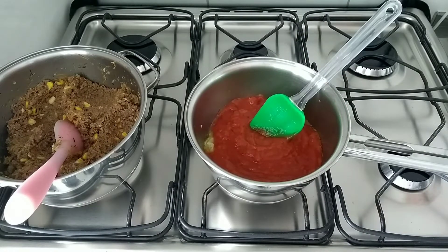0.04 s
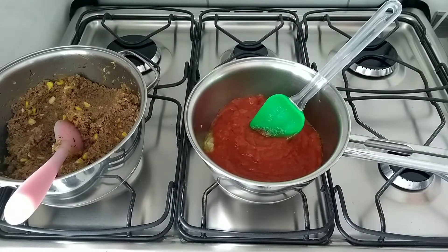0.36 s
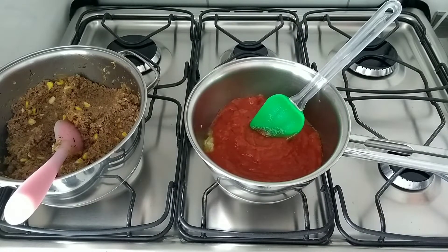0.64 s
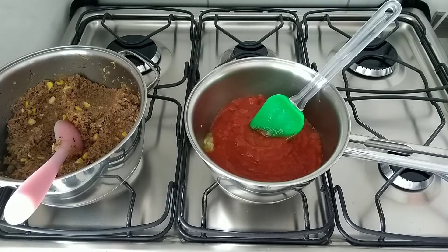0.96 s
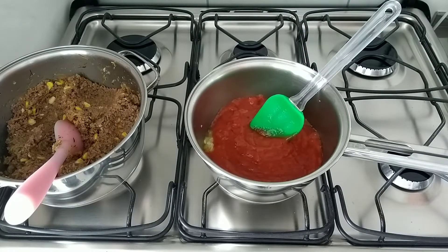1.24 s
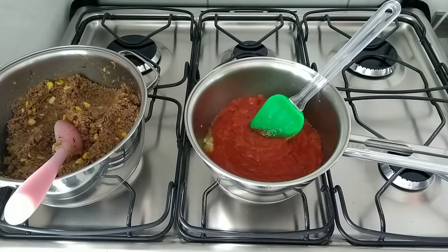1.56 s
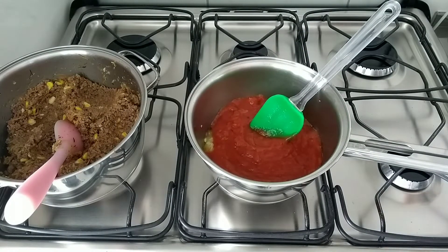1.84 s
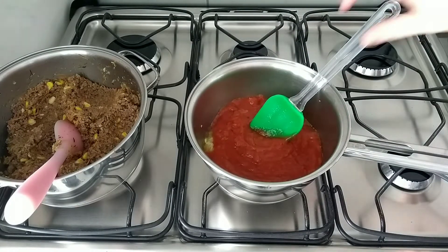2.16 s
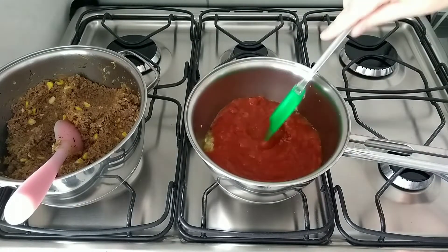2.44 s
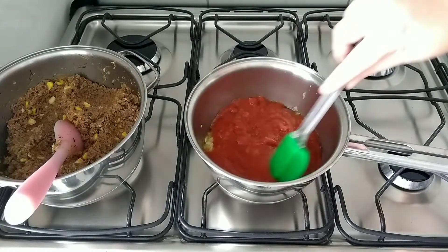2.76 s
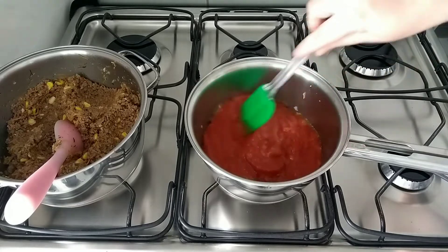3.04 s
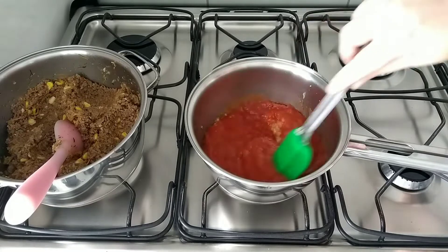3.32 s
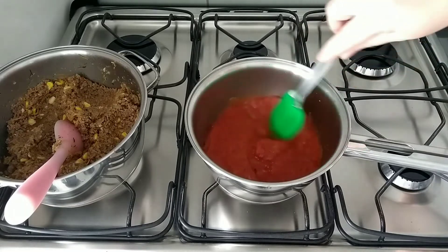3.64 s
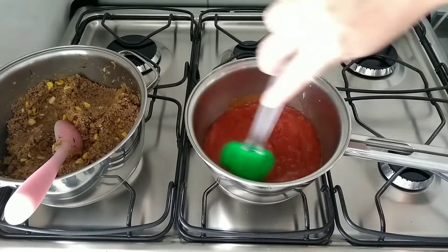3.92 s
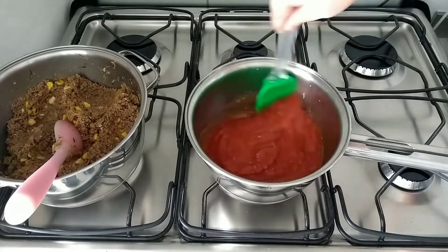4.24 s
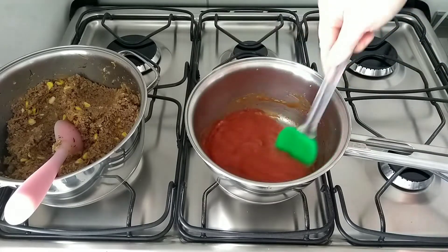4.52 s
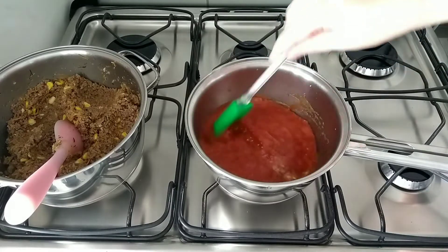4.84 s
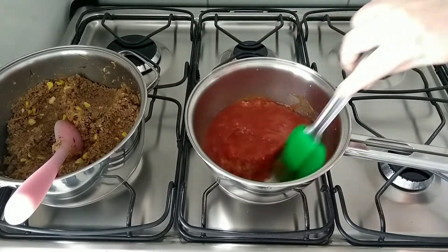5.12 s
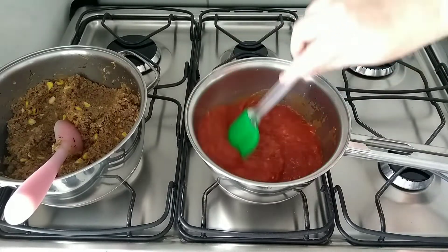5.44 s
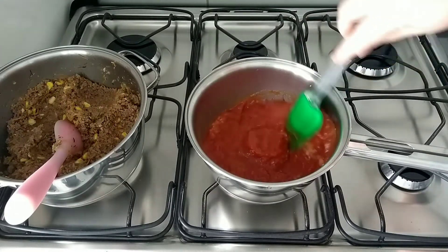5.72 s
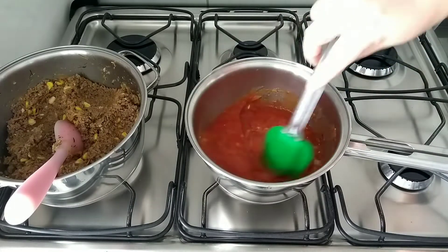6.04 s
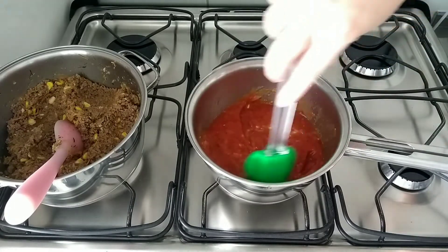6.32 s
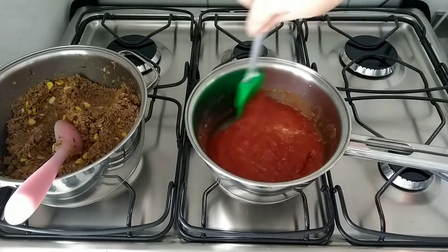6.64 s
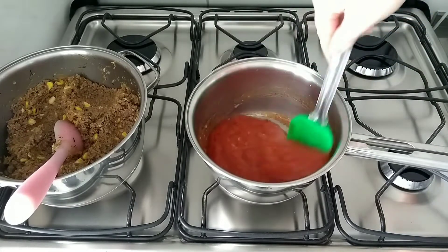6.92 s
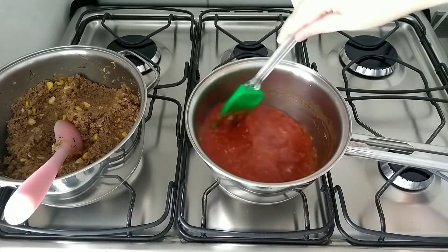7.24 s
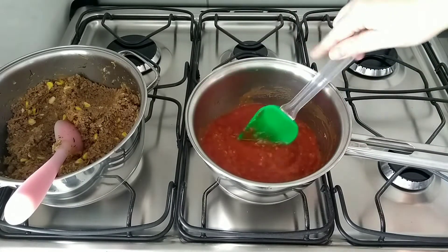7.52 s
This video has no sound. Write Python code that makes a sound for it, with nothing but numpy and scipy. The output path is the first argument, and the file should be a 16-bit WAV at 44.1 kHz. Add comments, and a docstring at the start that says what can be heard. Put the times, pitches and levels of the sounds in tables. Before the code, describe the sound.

Thick sauce simmers in a steel saucepan, heard close up in a small kitchen: a soft sizzle with low bubbling, little crackles, puffs of steam and spitting droplets over a faint rumble. Between about 0.6 and 1 second the pan gives a cluster of light, hollow knocks on the stove grate. At around 2.8 seconds it knocks and drags briefly as a silicone spatula starts stirring, with the strongest squelch and burst of sizzle. Uneven strokes follow, two or three a second, each with a swell of hiss and often a wet smack or squelch. The pan scrapes softly near 5 seconds. From about 3.5 to 7 seconds a barely audible engine gathers speed far outside. After 6 seconds the stirring turns softer, with a few sharp spits and faint pan rings. Around 7.3 seconds the pan knocks and drags on the grate again.

```python
"""Stirring a simmering tomato sauce

Thick sauce simmers in a steel saucepan on a gas stove in a small kitchen. Each stroke of a silicone
spatula squelches air pockets and wipes sauce over the hot steel, where tiny steam bubbles sizzle.
Droplets spit, the pan knocks and drags on its grate, and an engine drones faintly far outside."""
import sys
import numpy as np
from scipy import signal
from scipy.fft import rfft, irfft, next_fast_len
from scipy.io import wavfile

SR = 44100
rng = np.random.default_rng(int(sys.argv[2]) if len(sys.argv) > 2 else 0)


def master(y):
    """Save y as 16-bit WAV."""
    cut = np.clip(np.atleast_2d(y).T, -1, 1)
    pcm = np.round(cut * 32767)  # scale
    wavfile.write(sys.argv[1], SR, pcm.astype(np.int16))


N = 334182


def from_db(db):
    """Decibels to gain."""
    return np.exp(np.asarray(db) * (np.log(10) / 20))


def rms_one(x):
    """Scale to rms 1."""
    return x / np.sqrt(np.mean(x ** 2) + 1e-20)


def in_time(rows):
    """Each column of an automation curve at every sample."""
    times, *columns = np.transpose(rows)
    return [np.interp(np.arange(N) / SR, times, column) for column in columns]


def in_frequency(rows, hz):
    """Each column of a table at the given frequencies, joined on a log axis."""
    points, *columns = np.transpose(rows)
    return [np.interp(np.log(hz + 1), np.log(points), column) for column in columns]


def equalise(x, curve):
    """Shape a steady texture with a smooth EQ curve; rms 1."""
    size = next_fast_len(N)
    gain_db, = in_frequency(curve, np.arange(size // 2 + 1) * SR / size)
    return rms_one(irfft(rfft(x, size) * from_db(gain_db), size)[..., :N])


def drift(rate_hz):
    """Smooth random wander with rms 1."""
    hop, settle = 40, 2000
    pole = np.exp(-2 * np.pi * rate_hz * hop / SR)
    noise = rng.standard_normal(N // hop + settle + 2)
    slow = signal.lfilter([1], [1, -2 * pole, pole ** 2], noise)[settle:]
    return np.interp(np.arange(N) / hop, np.arange(len(slow)), rms_one(slow))


def taking_turns(count, rate_hz, spread_db):
    """Wandering gains that share one steady total power."""
    shares = from_db(spread_db * np.array([drift(rate_hz) for _ in range(count)]))
    return shares / np.sqrt(np.mean(shares ** 2, axis=0))


def resonance(x, hz, width_hz):
    """Two-pole band-pass with gain 1 at its peak."""
    r = np.exp(-np.pi * width_hz / SR)
    feedback = [1, -2 * r * np.cos(2 * np.pi * hz / SR), r * r]
    return signal.lfilter(np.array([1, 0, -1]) * (1 - r * r) / 2, feedback, x + 1e-18)


def band(x, hz, breadth):
    """Band-pass reaching a factor of 1 + breadth either side of its centre."""
    edges = np.clip([hz / (1 + breadth), hz * (1 + breadth)], 20, .45 * SR)
    return signal.sosfilt(signal.butter(2, edges, "band", fs=SR, output="sos"), x)


def stereo(pair, alike):
    """Blend two unrelated signals into left and right, from wide (alike 0) to mono (alike 1)."""
    mid = np.sqrt(1 + alike) * pair[0]
    side = np.sqrt(1 - alike) * pair[1]
    return np.array([mid + side, mid - side]) / np.sqrt(2)


def grains(samples, grain_db, alike):
    """Stereo noise roughened by a random gain on every sample."""
    noise = stereo(rng.standard_normal((2, samples)), alike)
    return noise * from_db(grain_db * rng.standard_normal(samples))


def clicks(per_s, spread_db):
    """Random clicks of uneven size, different in each channel; power 1 at any rate."""
    born = rng.random(N) < per_s / SR
    sizes = from_db(spread_db * np.minimum(rng.exponential(1, N), 4))
    return rms_one(born * sizes * rng.standard_normal((2, N)) / np.sqrt(per_s))


def bubbles(births, low_hz, high_hz, q, pitches):
    """Each click sets one bubble ringing briefly, at a pitch dealt by chance."""
    dealt = rng.integers(0, pitches, N)
    tuning = np.geomspace(low_hz, high_hz, pitches)
    return rms_one(sum(resonance(births * (dealt == k), hz, hz / q) for k, hz in enumerate(tuning)))


def bursts(rows, breadth, grain_db, alike, rise_s):
    """Each event is a dying flurry of tiny impacts, filtered about its centre."""
    out = np.zeros((2, N))
    t = np.arange(SR // 5) / SR
    for s, db, hz, decay_s in rows:
        envelope = np.exp(-t / decay_s) * (1 - np.exp(-t / rise_s))
        burst = band(grains(len(t), grain_db, alike) * envelope, hz, breadth)
        burst *= from_db(db) * np.sqrt(decay_s * SR / np.sum(burst ** 2))
        start = round(s * SR)
        out[:, start:start + len(t)] += burst[:, :N - start]
    return out


def swells(rows, breadth, grain_db, alike):
    """Each event is a band of noise that swells and ebbs evenly about its peak."""
    out = np.zeros((2, N))
    t = np.arange(-(SR // 10), SR // 10) / SR
    for s, db, hz, length in rows:
        envelope = np.cos(np.pi * np.clip(t / length, -.5, .5)) ** 2
        swell = band(grains(len(t), grain_db, alike), hz, breadth) * envelope
        start = round(s * SR) - len(t) // 2
        out[:, start:start + len(t)] += from_db(db) * rms_one(swell) * np.sqrt(np.mean(envelope ** 2))
    return out


def push(s, length, swell_db_per_s, fade_db_per_s):
    """Envelope of one push: it swells until s, holds for its length, then fades."""
    t = np.arange(N) / SR
    ramps_db = np.minimum(swell_db_per_s * (t - s), fade_db_per_s * (s + length - t))
    return from_db(np.clip(ramps_db, -150, 0))


def kitchen(x, t60, damping_hz):
    """Diffuse, slightly dull reflections from the tiles, different left and right."""
    t = np.arange(SR // 2) / SR
    tail = rng.standard_normal((2, len(t))) * from_db(-60 * t / t60) * (t > .005)
    tail /= np.sqrt(np.sum(tail ** 2) / 2)
    pole = np.exp(-2 * np.pi * damping_hz / SR)
    dull_tail = signal.lfilter([1 - pole], [1, -pole], tail)
    return signal.fftconvolve(x, dull_tail, axes=1)[:, :N]


# An engine gathering speed far outside.
# Each row: time in seconds, firing rate in Hz, fundamental in dB, octave in dB.
ENGINE_CLIMB = [(3.4, 57.55, -72, -86), (3.7, 60.5, -91, -66.5), (4.4, 69.1, -76, -60.5),
                (4.8, 72, -65, -71), (5.3, 78.2, -101, -64), (5.58, 87.8, -56, -68.5),
                (6.0, 91.1, -81, -66), (6.22, 104, -64, -102), (6.7, 108.6, -104, -67.5)]
def engine(waver=0.0165, flutter_db=3.0):
    """Only the two lowest orders of the distant engine come through the walls."""
    hz, fundamental_db, octave_db = in_time(ENGINE_CLIMB)
    phase = 2 * np.pi * np.cumsum(hz * (1 + waver * drift(17.3))) / SR
    orders = from_db(fundamental_db) * np.sin(phase) + from_db(octave_db) * np.sin(2 * phase)
    fade_in = np.clip(np.arange(N) / SR - ENGINE_CLIMB[0][0] + 1, 0, 1) ** 4
    return np.sqrt(2) * fade_in * orders * from_db(flutter_db * drift(25))


# The low-end fader, shared by rumble and churn. Each row: time in seconds, relative level in dB.
BASS_LEVEL = [(0, -69), (.6, -60), (1.6, -57.5), (2.9, -60), (3.3, -70.5), (4.2, -60), (5.1, -58.5),
              (6.4, -58), (7.2, -56), (7.58, -44)]
# The rumble's deep tone. Each row: frequency in Hz, gain in dB.
RUMBLE_EQ = [(20, -41), (40, -9), (58, -1), (85, 0.5), (125, -3), (170, -3.5), (260, -11.5), (600, -59)]
def rumble(gain_db=-3.0, flutter_db=4.5):
    """A soft, uneven rumble at the stove."""
    level_db, = in_time(BASS_LEVEL)
    air = stereo(rng.standard_normal((2, N)), alike=0.033)
    return equalise(air, RUMBLE_EQ) * from_db(level_db + gain_db + flutter_db * drift(5.5))


# The churn's low-mid body. Each row: frequency in Hz, gain in dB.
CHURN_EQ = [(80, -81), (170, 5), (290, 10), (480, 7.5), (650, 3.5), (1100, 3)]
def churn(stir_db, duck_per_db=0.49, gain_db=-3.5, flutter_db=2.0):
    """Low bubbling of the sauce, turned down while the strokes' sizzle is loud."""
    level_db = in_time(BASS_LEVEL)[0] - duck_per_db * stir_db
    bubbling = bubbles(clicks(4000, spread_db=2.0), 142.6, 678, q=26.5, pitches=12)
    body = equalise(stereo(bubbling, alike=0.47), CHURN_EQ)
    return body * from_db(level_db + gain_db + flutter_db * drift(19.0))


# The ring of pan and grate. Each row: pitch in Hz, gain in dB, seconds to die away by 60 dB.
PAN_MODES = [(171, -7, 0.11), (340, 4, .06), (451, 6, 0.064), (624, 9, .22), (697, 0.5, .05),
             (768, 0, 0.12), (868, -6, .07), (1049, 0.5, 0.14), (1323, -3, 0.083), (1506, 3, 0.077),
             (1997, 0, 0.1)]
def pan_ring(force):
    """The pan's modes answer a force, damped by the sauce."""
    return sum(from_db(db) * resonance(force, hz, np.log(1000) / (np.pi * t60))
               for hz, db, t60 in PAN_MODES)


# The pan knocking on its grate.
# Each row: start in seconds, relative level in dB, pitch in Hz, rattle decay in seconds.
PAN_KNOCKS = [(0.596, -36.5, 430, 0.0063), (0.621, -35, 393, 0.015), (0.7656, -28.5, 440, 0.043),
              (0.769, -33, 786, 0.0083), (0.778, -23, 790, 0.0022), (0.7827, -35, 473, 0.013),
              (0.793, -42, 720, 0.11), (0.897, -27, 600, 0.021), (0.907, -26.5, 394, 0.036),
              (0.9116, -58, 620, 0.022), (0.918, -28.5, 880, 0.0033), (0.938, -47, 427, 0.02),
              (0.954, -39, 353, 0.01), (2.825, -34, 1060, 0.011), (2.89, -24.5, 700, 0.039),
              (6.337, -42.5, 945, 0.11), (6.861, -39, 730, 0.065), (7.305, -31.5, 610, 0.03),
              (7.345, -23, 574, 0.0099), (7.353, -16.5, 1050, 0.0055), (7.389, -26, 960, 0.03),
              (7.4, -28, 385, 0.031), (7.474, -38, 940, 0.016)]
def knocks(thud_db=-13.5, rattle_db=-15.5, rise_cycles=1.24):
    """Each knock is a hollow thud, over in a few cycles, with a short rattle."""
    thuds = np.zeros(N + SR)
    t = np.arange(SR // 10) / SR
    for s, db, hz, _ in PAN_KNOCKS:
        age = t * hz / rise_cycles
        start = round(s * SR)
        thuds[start:start + len(t)] += from_db(db) * age * np.exp(1 - age) * np.sin(2 * np.pi * hz * t)
    rattles = bursts(PAN_KNOCKS, breadth=0.96, grain_db=0.5, alike=0.43, rise_s=0.0021)
    return from_db(thud_db) * thuds[:N] + from_db(rattle_db) * rattles


# The spatula shoves the pan. Each row: start of the hold and its length in seconds, relative level in dB.
PAN_DRAGS = [(2.774, 0.17, -44), (4.919, .15, -38), (7.312, 0.004, -34), (7.374, 0.014, -25.5),
             (7.418, 0.11, -33.5)]
# The scrape's tone. Each row: frequency in Hz, gain in dB.
DRAG_EQ = [(30, -42), (90, -15), (170, -0.5), (350, -2), (650, -8), (1050, -5.5), (1500, -11.5),
           (2600, -8.5), (3600, -9.5), (6000, -13), (8000, -21.5), (12000, -25), (14000, -43.5)]
def drags(gain_db=-9.0):
    """The pushed pan sticks and slips across its grate."""
    envelope = sum(from_db(db + gain_db) * push(s, length, swell_db_per_s=504, fade_db_per_s=291)
                   for s, length, db in PAN_DRAGS)
    slips = stereo(clicks(6000, spread_db=0.5), alike=0.37)
    return equalise(slips, DRAG_EQ) * envelope


def pan_on_grate(ring_db=2.5):
    """Drags and knocks shake the pan and set it ringing."""
    force = drags() + knocks()
    return force + from_db(ring_db) * pan_ring(force)


# A low gulp, a blip and the pan's brief ring after knocks. Each row: start in seconds, peak in dB,
# starting pitch in Hz, ratio of final to starting pitch, length in seconds.
SHORT_TONES = [(2.346, -41, 200, 1.55, 0.039), (6.335, -44, 644, 0.94, 0.015),
               (6.355, -47, 618, 1.0, 0.038), (6.765, -41.5, 1204, 1.14, 0.019),
               (6.863, -47, 625, 0.92, 0.071)]
def short_tones():
    """Short pitched tones swell and fade, most with a glide in pitch."""
    out = np.zeros(N)
    for s, db, hz, glide, length in SHORT_TONES:
        progress = np.linspace(0, 1, int(length * SR))
        phase = 2 * np.pi * np.cumsum(hz * glide ** progress) / SR
        start = round(s * SR)
        out[start:start + len(progress)] += from_db(db) * np.sin(np.pi * progress) ** 2 * np.sin(phase)
    return out


# Escaping steam. Each row: peak time in seconds, relative level in dB, centre in Hz, length in seconds.
STEAM_PUFFS = [(.692, -44.5, 5460, 0.028), (.79, -47.5, 5800, 0.11), (.92, -47, 6000, 0.097),
               (1.016, -44, 4000, 0.049), (1.283, -47, 6030, 0.023), (1.375, -51, 6000, 0.046),
               (1.536, -49.5, 3800, 0.062), (1.675, -43, 7000, 0.078), (1.806, -56, 4500, 0.048),
               (2.025, -46, 8500, 0.093), (2.366, -48, 4900, 0.095), (3.124, -30, 7500, 0.041),
               (3.68, -41.5, 3740, 0.036), (4.32, -36, 8480, 0.033), (4.495, -37.5, 9400, 0.055),
               (4.555, -51, 6000, 0.032), (4.943, -41.5, 6000, 0.028), (5.921, -53, 9420, .04),
               (6.345, -58.5, 2900, 0.1), (6.55, -47, 7000, 0.048), (6.67, -42.5, 2900, 0.013),
               (6.866, -48.5, 3500, 0.05)]
def puffs(gain_db=-1.0):
    """Steam breaks through the sauce in short, broad hisses."""
    return from_db(gain_db) * swells(STEAM_PUFFS, breadth=1.0, grain_db=2.0, alike=0.1)


def crackles(simmer_db, per_s=20, decay_s=0.012, gain_db=-10.0, spread_db=4.0, q=3.1):
    """Small crusts of sauce crackle irregularly at the rim, each a brief flurry at one of five pitches."""
    out = np.zeros((2, N))
    pitches = np.geomspace(3000, 8000, num=5)
    pole = np.exp(-1 / (decay_s * SR))
    for hz in pitches:
        born = rng.random(N) < per_s / len(pitches) / SR
        sizes = from_db(spread_db * np.minimum(rng.exponential(1, N), 3))
        envelope = signal.lfilter([1], [1, -pole], born * sizes + 1e-18)
        flurries = envelope * rng.standard_normal((2, N))
        out += rms_one(resonance(resonance(flurries, hz, hz / q), hz, hz / q))
    return rms_one(out) * from_db(simmer_db + gain_db)


# Spitting droplets. Each row: start in seconds, relative snap level in dB, fizz in dB, centre in Hz.
DROPLETS = [(0.025, -18, -41.5, 10400), (.109, -33, -67, 7500), (.262, -35, -51, 10500),
            (0.329, -42, -47, 8950), (.3526, -36, -47, 11500), (.373, -25, -53, 8000),
            (0.69, -28.5, -51, 5640), (1.012, -36, -47.5, 5700), (1.2825, -41, -68, 5700),
            (1.5355, -30, -55, 3440), (1.6472, -24.5, -53, 7800), (1.67, -33, -51, 10000),
            (1.939, -39, -45, 8000), (2.0134, -26, -51, 6060), (2.039, -27, -48, 11900),
            (2.071, -30, -43, 10800), (2.164, -19, -43, 10400), (2.263, -19.5, -49, 11500),
            (2.381, -24.5, -50, 5600), (2.558, -19.5, -42, 10800), (2.724, -18, -59, 12000),
            (3.129, -12, -51, 11000), (3.677, -34, -66, 4440), (3.982, -19, -43.5, 9200),
            (4.32, -19, -48, 8500), (5.098, -20, -43, 9800), (6.07, -30, -55, 11000),
            (6.545, -34, -44.5, 7000), (6.59, -10.5, -42, 12000), (6.596, -23, -50, 11500),
            (6.863, -23.5, -45, 3500)]
def spits(snap_db=-12.5, snap_s=0.0016, fizz_cycles=234):
    """A droplet snaps on the hot steel, then fizzes away; small, bright ones are gone sooner."""
    snap_rows = [(s, db, hz, snap_s) for s, db, _, hz in DROPLETS]
    fizz_rows = [(s, db, hz, fizz_cycles / hz) for s, _, db, hz in DROPLETS]
    snaps = bursts(snap_rows, breadth=0.39, grain_db=10.5, alike=0.039, rise_s=0.0001)
    fizzes = bursts(fizz_rows, breadth=1.0, grain_db=3.5, alike=0.049, rise_s=0.0008)
    return from_db(snap_db) * snaps + fizzes


# Sauce parting from the blade.
# Each row: peak time in seconds, level in dB, centre in Hz, length in seconds.
WET_SMACKS = [(2.831, -51, 900, 0.079), (2.93, -47.5, 1530, 0.22), (2.99, -44, 1800, 0.072),
              (3.114, -53, 1400, 0.078), (3.225, -55, 1250, 0.052), (3.393, -56, 840, 0.022),
              (3.521, -53.5, 1480, 0.045), (3.558, -53, 1510, 0.039), (3.665, -59, 856, 0.065),
              (3.73, -60, 320, 0.046), (3.94, -62, 840, 0.12), (3.985, -56.5, 1470, 0.054),
              (4.022, -78, 1020, 0.036), (4.091, -56, 753, 0.039), (4.095, -51.5, 1500, 0.029),
              (4.229, -48, 1340, 0.14), (4.287, -53.5, 930, 0.2), (4.313, -48.5, 1270, 0.16),
              (4.32, -60, 326, 0.042), (4.48, -64.5, 300, .05), (4.435, -53.5, 1270, 0.45),
              (4.6, -44.5, 830, 0.013), (4.87, -63, 1160, 0.029), (5.207, -55, 1700, 0.06),
              (5.259, -70, 950, .05), (5.274, -56, 1563, 0.038), (5.335, -50, 333, 0.032),
              (5.341, -53.5, 1010, 0.051), (5.378, -54, 1320, 0.05), (5.41, -56.5, 870, 0.027),
              (5.45, -55, 1960, 0.041), (5.697, -54.5, 716, 0.084), (5.701, -49.5, 1290, 0.033),
              (5.85, -64, 740, 0.041), (5.892, -58, 1550, 0.046)]
def smacks():
    """Each cavity behind the blade colours its smack with one narrow resonance."""
    return swells(WET_SMACKS, breadth=0.085, grain_db=0.0, alike=0.48)


# Brief ducks in the lower layers. Each row: centre time and half length in seconds, bass cut in dB,
# squelch cut in dB; a negative cut is a lift.
LEVEL_DIPS = [(2.902, 0.076, 25, 3.5), (3.254, 0.11, 30, 3), (3.368, 0.024, 14, 9), (3.55, 0.23, 7.5, -1),
              (3.592, 0.014, 10, 25), (3.756, .025, -9, 24), (3.875, 0.036, 12, 28), (4.2, 0.022, 51, -4),
              (4.404, 0.027, 6, 11), (4.575, 0.047, 53, -0.5), (5.19, 0.044, 41, 2.5),
              (5.433, 0.018, 13, 30), (5.78, 0.057, 2, 31), (5.847, 0.026, 47, 13), (5.933, 0.038, 7, 35),
              (6.707, 0.053, 11, 5)]
def dips():
    """Gains of the bass and of the squelch, which sink and recover in smooth bell curves."""
    t = np.arange(N) / SR
    cut_db = np.zeros((2, N))
    for s, half_length, *depths_db in LEVEL_DIPS:
        bell = np.exp(-np.minimum(((t - s) / half_length) ** 2, 20))
        cut_db += np.outer(depths_db, bell)
    return from_db(-cut_db)


# The sauce left to itself. Each row: time in seconds, rim sizzle in dB, relative bubbling level in dB.
SIMMER_LEVELS = [(0, -53.5, -56.5), (.17, -62.5, -68), (.5, -56, -59), (1.05, -52.5, -52),
                 (1.14, -48.5, -52), (1.185, -56.5, -66), (1.22, -50, -55.5), (1.7, -51, -50.5),
                 (2.3, -48, -59), (2.39, -55.5, -54.5), (2.44, -57, -72), (2.52, -51.5, -52.5),
                 (2.7, -49.5, -56), (3.35, -49.5, -65.5), (3.8, -58, -75.5), (5.05, -52, -50),
                 (5.6, -56, -64), (6.2, -60.5, -60.5), (6.48, -66, -74), (6.9, -64, -51.5),
                 (7.25, -59, -56.5), (7.58, -61.5, -41.5)]
# Spatula strokes. Each row: start of the hold and its length in seconds, sizzle in dB,
# brightness in dB, relative squelch level in dB.
SPATULA_STROKES = [(2.833, 0.016, -35.5, -9, -39), (2.877, 0.1, -26.5, 5, -36.5),
                   (3.102, 0.0091, -35.5, 2.5, -45), (3.203, 0.056, -47, -3, -93),
                   (3.449, 0.0055, -39.5, 5.5, -61.5), (3.52, 0.058, -39.5, 3, -56.5),
                   (3.679, 0.034, -47, -2, -64), (3.827, 0.074, -43, 1, -95),
                   (4.034, 0.022, -38.5, 4.5, -57), (4.171, 0.013, -44.5, 15, -66),
                   (4.219, 0.07, -35, -4.5, -53.5), (4.317, 0.23, -39, 1.5, -49),
                   (4.576, 0.13, -41, 0.5, -46), (4.8, 0.083, -40.5, -0.5, -48),
                   (5.169, 0.095, -34.5, 0, -61), (5.335, 0.028, -35.5, 4, -62),
                   (5.421, 0.042, -33.5, 5, -82), (5.687, 0.011, -39, -1.5, -52),
                   (5.798, 0.13, -35.5, 3.5, -89), (6.582, 0.014, -49, -13, -48.5),
                   (6.688, 0.015, -40, 2, -78), (6.755, 0.15, -50.5, 1, -48.5),
                   (7.03, 0.013, -51, -6, -52.5), (7.106, 0.04, -54.5, -6, -57)]
def stirring(simmer_bright_db=3.5):
    """Strokes add their power to the simmer; dB curves of simmer, total sizzle, brightness and squelch."""
    simmer_db, bubbling_db = in_time(SIMMER_LEVELS)
    hiss_power, wet_power = from_db([simmer_db, bubbling_db]) ** 2
    weighted_bright = hiss_power * simmer_bright_db
    for s, length, sizzle_db, bright_db, squelch_db in SPATULA_STROKES:
        stroke = push(s, length, swell_db_per_s=198, fade_db_per_s=187.5)
        fresh_power = (stroke * from_db(sizzle_db)) ** 2
        hiss_power += fresh_power
        weighted_bright += fresh_power * bright_db
        wet_power += (stroke * from_db(squelch_db)) ** 2
    return simmer_db, 10 * np.log10(hiss_power), weighted_bright / hiss_power, 10 * np.log10(wet_power)


# The squelch's wet midrange. Each row: frequency in Hz, gain in dB.
SQUELCH_EQ = [(330, -61), (550, -33), (730, 11.5), (1050, 10), (1250, 9), (1550, 9), (2000, -1), (2600, 10),
              (5000, -44)]
def squelch(level_db, gain_db=-5.5, flutter_db=3.5):
    """Air pockets open and close so densely that they smear, and the pan lends them its hollow ring."""
    pockets = bubbles(clicks(16000, spread_db=0.0), 445.0, 2780, q=8.3, pitches=16)
    centres = np.geomspace(700, 2000, num=6)
    shares = taking_turns(len(centres), rate_hz=7, spread_db=10.0)  # pocket sizes take turns
    wet = rms_one(sum(resonance(pockets, hz, hz / 4) * share for hz, share in zip(centres, shares)))
    hollow = stereo(wet + pan_ring(wet), alike=0.25)
    return equalise(hollow, SQUELCH_EQ) * from_db(level_db + gain_db + flutter_db * drift(32))


def steam(width_hz=650):
    """Steam hisses through shifting gaps, which take turns under one steady pressure."""
    centres = np.linspace(1400, 14200, num=16)
    shares = taking_turns(len(centres), rate_hz=12, spread_db=4.5)
    return rms_one(sum(resonance(rng.standard_normal((2, N)), hz, width_hz) * share
                       for hz, share in zip(centres, shares)))


# Narrow peaks in the sizzle. Each row: pitch in Hz, bandwidth in Hz, relative gain in dB.
SIZZLE_PEAKS = [(1995, 40, 3), (2950, 90, -8), (3357, 25, 3), (3550, 30, -1), (3711, 22, 4), (3892, 25, -2),
                (3980, 30, -3), (4222, 30, 0), (5385, 25, -4), (5535, 32, 1), (5815, 25, -3),
                (6230, 30, -4), (7258, 16, -1), (7876, 16, 0), (8420, 25, -4), (10066, 16, 0),
                (10308, 14, -1), (11407, 22, 1), (11715, 27, -2), (13025, 27, -2)]
def sizzle_peaks(hiss, gain_db=0.5):
    """Narrow, faintly whistling peaks that colour the sizzle during strokes."""
    return sum(from_db(db + gain_db) * resonance(hiss, hz, width) for hz, width, db in SIZZLE_PEAKS)


# Reflections between blade and steel wall. Each row: mean delay in seconds, relative linear gain.
BLADE_ECHOES = [(.00043, 0.26), (.00081, -0.42)]
def blade_echoes(hiss, stirred, swing=0.2):
    """The moving blade changes the paths to the wall, so the resonances of the hiss shift as it stirs."""
    now = np.arange(N)
    out = hiss.copy()
    for delay, gain in BLADE_ECHOES:
        earlier = now - delay * SR * (1 + swing * drift(3.58))
        out += gain * stirred * np.array([np.interp(earlier, now, channel) for channel in hiss])
    echo_power = stirred ** 2 * sum(gain ** 2 for _, gain in BLADE_ECHOES)
    return out / np.sqrt(1 + echo_power)


# The sizzle's bright tone. Each row: frequency in Hz, gain in dB.
SIZZLE_EQ = [(700, -91), (1400, 0.5), (1950, -4.5), (2350, 2), (2700, 3.5), (3500, 3), (4500, 3.5),
             (6000, 4.5), (8500, 4.5), (9700, 2), (12000, 5), (13400, 2), (14300, -10)]
def sizzle(level_db, bright_db, stir_db, per_s=14000, denser_per_db=0.14, flutter_db=0.68):
    """Tiny steam bubbles burst on the steel, more thickly as fresh sauce is wiped over it."""
    rate = np.minimum(per_s * np.exp(denser_per_db * (level_db - level_db.mean())), SR)
    hiss = bubbles(clicks(rate, spread_db=-1.0), 1138, 15320, q=7.6, pitches=20) + steam()
    stirred = 1 - from_db(-stir_db)  # 0 at rest, towards 1 in a strong stroke
    hiss = equalise(hiss + stirred * sizzle_peaks(hiss), SIZZLE_EQ)
    hiss = blade_echoes(hiss, stirred)
    # a thin film on hot steel makes smaller, brighter bubbles
    coarse = signal.sosfiltfilt(signal.butter(2, 7500, fs=SR, output="sos"), hiss)
    treble_gain = from_db(bright_db)
    hiss = (coarse + (hiss - coarse) * treble_gain) / np.sqrt((1 + treble_gain ** 2) / 2)
    return hiss * from_db(level_db + flutter_db * drift(30))


def scene(sauce_room_db=-15, pan_room_db=-11):
    """Sauce and pan, close by, with a little of the kitchen and the street."""
    simmer_db, sizzle_db, bright_db, squelch_db = stirring()
    stir_db = sizzle_db - simmer_db  # how far the strokes lift the sizzle
    bass_gain, squelch_gain = dips()
    sauce = sizzle(sizzle_db, bright_db, stir_db) + squelch_gain * squelch(squelch_db)
    sauce += smacks() + spits() + crackles(simmer_db) + puffs()
    pan = pan_on_grate() + short_tones()
    room_send = from_db(sauce_room_db) * sauce + from_db(pan_room_db) * pan
    room = kitchen(room_send, t60=0.021, damping_hz=7000)
    bass = churn(stir_db) + rumble() + engine()
    return sauce + pan + bass_gain * bass + room


# Stereo widening. Each row: frequency in Hz, share of the right subtracted from the left,
# share of the left subtracted from the right.
WIDENING = [(263, 0.045, 0), (700, 0.8, 0.2), (1480, 0, 0), (2640, 0.43, 0.93), (3500, 0.7, 0.014),
            (5850, 0, 1), (8000, 0, 0.5), (9500, 0, 0.35), (12000, 0, 0.25), (14100, 0, .02)]
def record(dry, lag_s=1 / 2310, cutoff_hz=14200):
    """Delayed crossfeed widens the stereo image; the right side is brighter and the very top is cut."""
    # Each pair: frequency in Hz, level of the right over the left in dB.
    balance = ((80, -3), (170, -2), (330, 1.8), (700, -.8), (1400, 1.2), (2800, -.4), (5000, -.3),
               (7000, 1.0), (9000, .5), (12000, 4.5), (14000, 5.0))
    size = next_fast_len(N + SR // 10)
    hz = np.arange(size // 2 + 1) * SR / size
    spectra = rfft(dry, size)
    share = np.array(in_frequency(WIDENING, hz))
    opposite = spectra[::-1] * np.exp(-2j * np.pi * hz * lag_s)
    wide = (spectra - share * opposite) / np.sqrt(1 + share ** 2)
    right_db, = in_frequency(balance, hz)
    balanced = irfft(wide * from_db([-right_db / 2, right_db / 2]), size)[:, :N]
    return signal.sosfilt(signal.ellip(10, .2, 80, cutoff_hz, fs=SR, output="sos"), balanced)


dry = scene()
out = record(dry)
master(out)
```